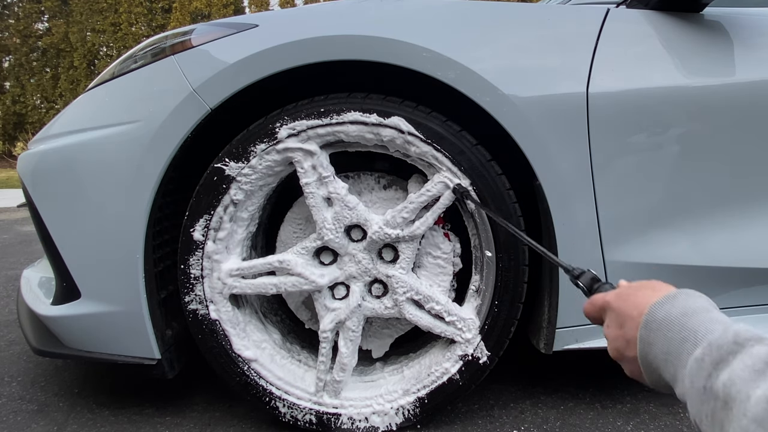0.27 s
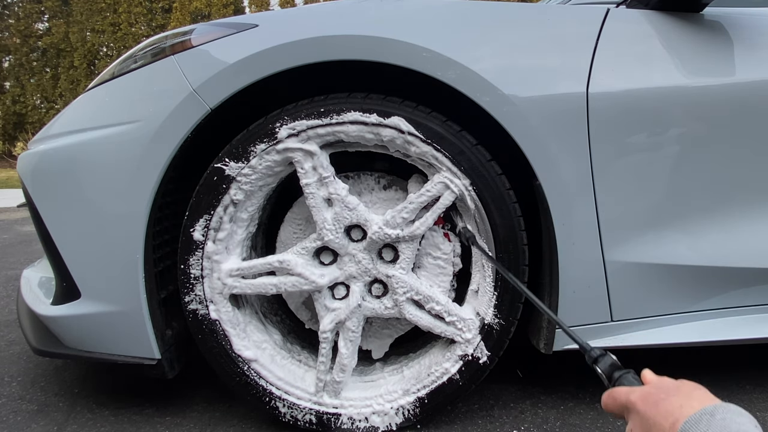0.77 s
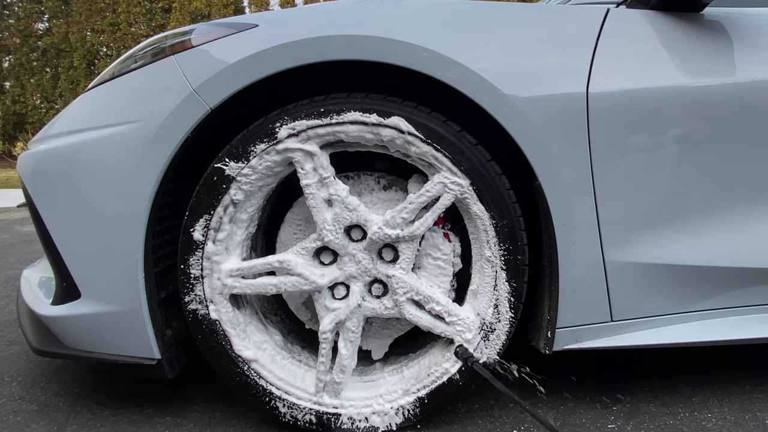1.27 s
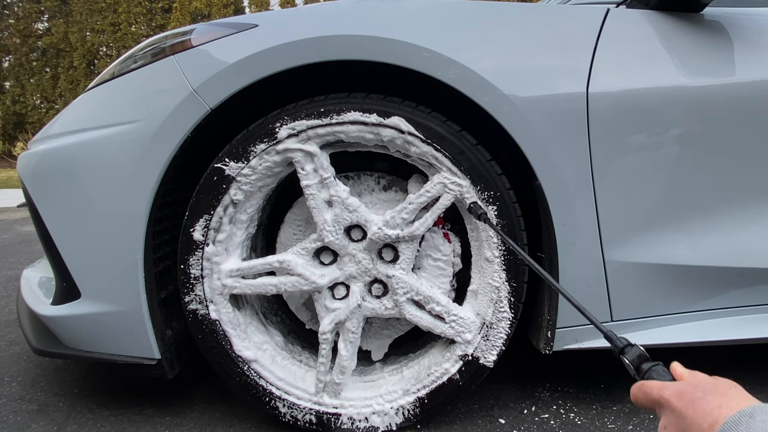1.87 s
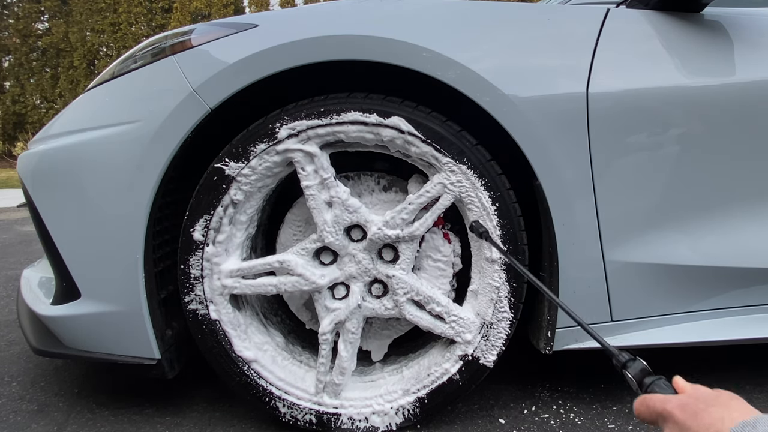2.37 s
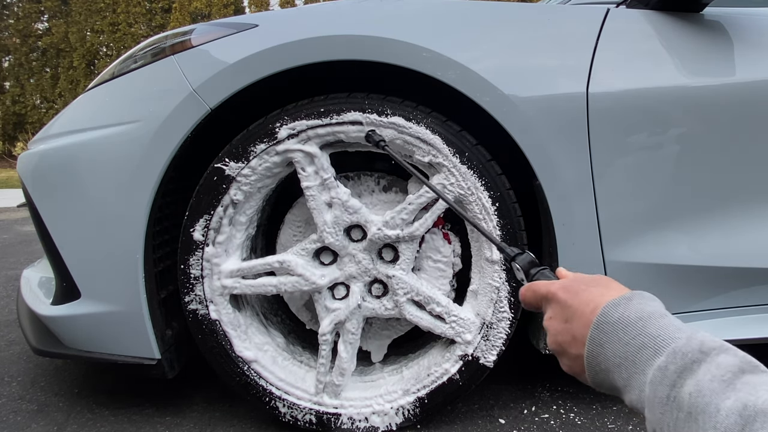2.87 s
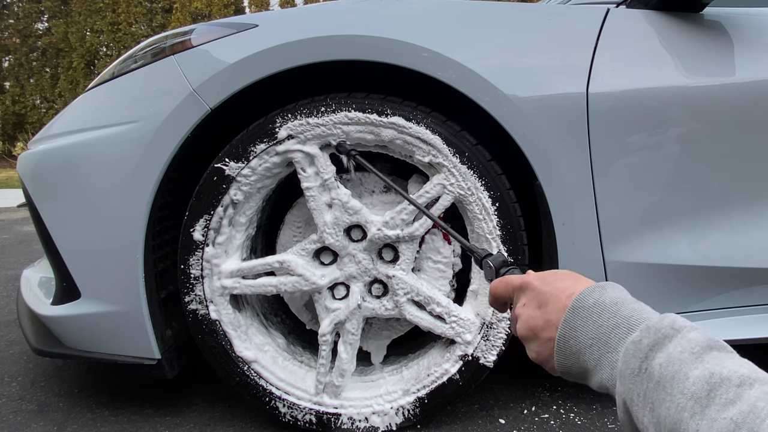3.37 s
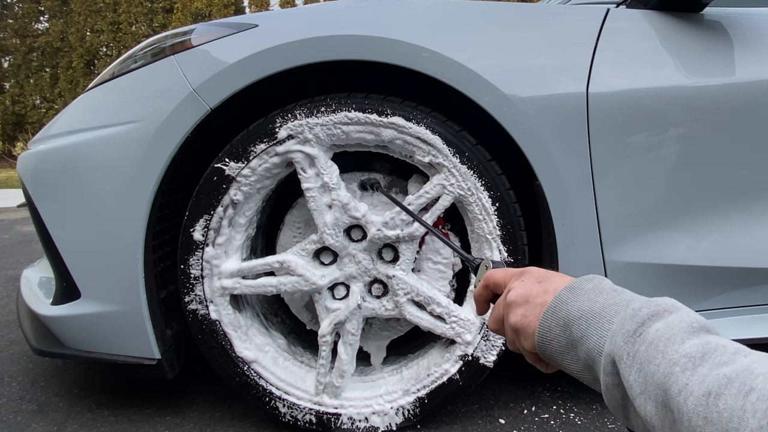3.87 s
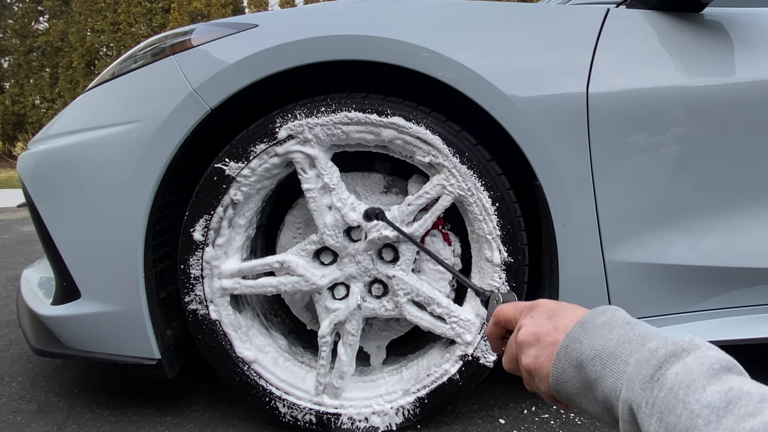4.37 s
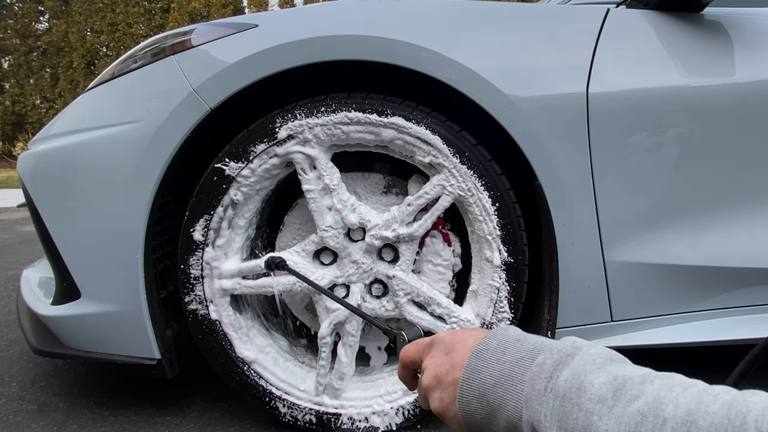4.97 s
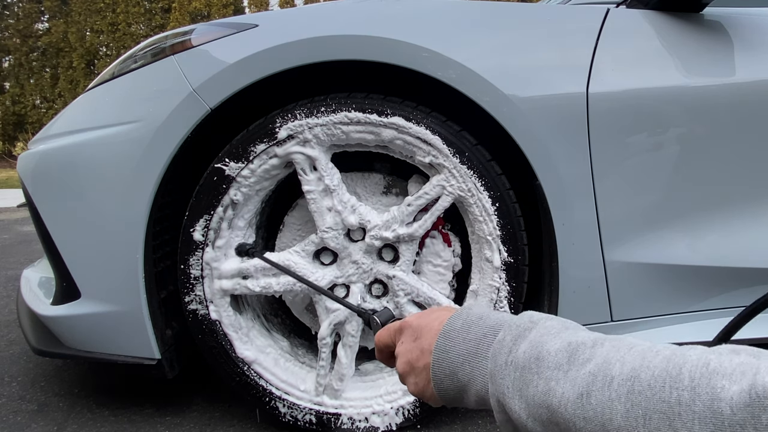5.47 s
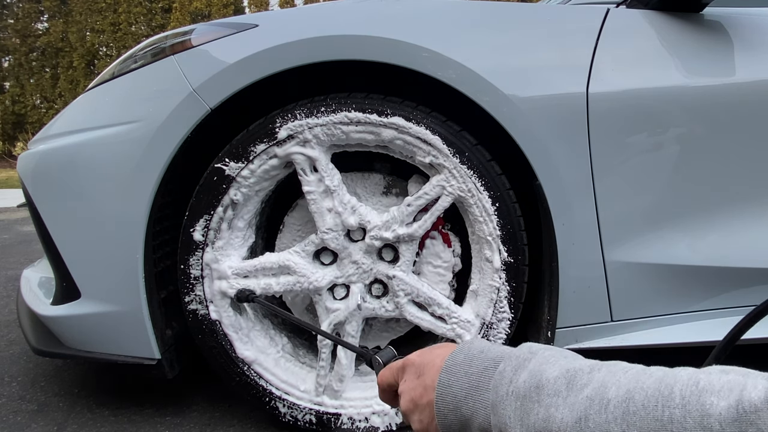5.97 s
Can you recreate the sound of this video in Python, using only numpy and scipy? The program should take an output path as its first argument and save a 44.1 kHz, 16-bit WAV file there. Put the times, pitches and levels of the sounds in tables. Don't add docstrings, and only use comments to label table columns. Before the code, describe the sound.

A hand-pumped sprayer hisses steadily onto a foamy car wheel, its airy sputtering spray shifting as the wand sweeps, while wind rumbles on the microphone.

```python
import sys
import numpy as np
from scipy import signal
from scipy.fft import rfft, irfft
from scipy.io import wavfile
from scipy.ndimage import map_coordinates

SR = 44100
rng = np.random.default_rng(int(sys.argv[2]) if len(sys.argv) > 2 else 0)


def materialize(psi):
    bounded = np.clip(np.atleast_2d(psi).T, -1, 1)
    quanta = np.round(bounded * 32767).astype(np.int16)
    wavfile.write(sys.argv[1], SR, quanta)


def field_ratio(decibels):
    return 10 ** (np.asarray(decibels, dtype=float) / 20)


N = 274743
SIDES = np.array([[1], [-1]])

# time in seconds, lead in samples.
WAND_LEAD = [(0, 5.3), (.08, 5.5), (.27, 5.7), (.36, 2.8), (.5, 2.2), (2.5, 2.2), (2.6, 3.4), (2.84, 3.6),
             (2.88, 5.1), (3.0, 5.5), (3.1, 6.7), (3.5, 6.5), (3.74, 7.2), (3.86, 6.2), (4.2, 6), (4.38, 5),
             (4.5, 6.5), (4.75, 7.4), (5.08, 7.2), (5.22, 8.3), (5.5, 7.8), (5.8, 8.5), (6.23, 8.4)]
# time in seconds, hiss level in dB.
FLOW = [(0, -48.5), (.2, -48), (.33, -44), (.42, -40), (.6, -39.5), (.8, -42), (1.2, -41), (1.4, -45),
        (1.85, -39.5), (2.3, -49), (2.55, -44.5), (3.2, -39.5), (3.6, -46.5), (4.5, -45), (5.7, -48),
        (5.95, -43), (6.15, -43), (6.23, -47)]
# centre in seconds, length in seconds, hiss gain in dB,
# splash gain in dB.
STRIKES = [(.2, 0.058, 0, 2), (.36, 0.15, -4.5, 0), (.55, 0.17, -1.5, -6), (.97, 0.33, 1, 4),
           (1.42, 0.16, 1, 5), (1.55, 0.13, 2, 0.5), (1.66, 0.15, 2.5, 0), (1.78, 0.3, -4.5, 2),
           (1.9, 0.15, -0.5, 1.5), (2.22, 0.33, 3.5, 1.5), (2.48, 0.68, 5, 6), (3.4, 0.065, 1, 5.5),
           (3.55, 0.38, 4, 3), (3.7, 0.11, 4.5, 4.5), (3.8, 0.089, 3, 4), (3.9, 0.046, 3.5, 2),
           (4.03, 0.15, 5.5, -6), (4.15, 0.076, 3, 4.5), (4.25, 0.12, 7, 7), (4.33, 0.04, 6.5, 5.5),
           (4.44, 0.11, 6, 5), (4.68, 0.18, 5.5, -0.5), (4.88, 0.23, 1.5, -3.5), (5.03, 0.16, 6, 0),
           (5.15, 0.13, 2, -2), (5.28, 0.24, 3, 3), (5.48, 0.14, 0.5, 0), (5.61, 0.14, 5, 3.5),
           (5.82, 0.13, 1, 0)]
# time in seconds, share from 0 to 1.
SCATTER = [(0, 1), (.07, 0.15), (.14, 1), (.4, 0.9), (2.5, 0.9), (2.65, 0.67), (2.95, .45), (3.3, 0.85),
           (3.42, 0.5), (3.55, 0.82), (3.82, 0.74), (3.88, .2), (4.03, 0.2), (4.15, 0.5), (4.27, 0.9),
           (4.38, 0.3), (4.46, 1), (4.8, 0.75), (5.1, 0.42), (6.23, 0.2)]
# delay in ms, slide in ms per sample of lead, wander in ms, level in dB,
# extra left lead in samples.
ECHOES = [(0.55, .03, 0.039, -8.5, 2.7), (0.85, -.04, 0.054, -8.5, -2.08), (1.247, .01, 0.037, -9.5, 1.2),
          (1.898, .08, 0.091, -9, -2.5), (2.8, -.1, 0.14, -8.5, 4), (4.099, .12, 0.22, -13, -3.5)]
# centre in seconds, length in seconds, pitch in Hz, level in dB.
HOLLOWS = [(0.195, 0.14, 2380, -49.5), (0.316, 0.032, 1630, -42.5), (0.37, 0.14, 2630, -46),
           (0.56, 0.31, 1155, -52.5), (0.946, 0.058, 1540, -46), (0.987, 0.052, 2400, -45),
           (1.255, 0.024, 1240, -46), (1.784, 0.058, 1250, -52), (2.225, 0.095, 1750, -49),
           (2.503, 0.15, 1660, -50), (3.805, 0.031, 1830, -50), (4.036, 0.098, 2180, -47.5),
           (0.634, 0.25, 6760, -39.5), (2, 0.28, 9750, -45), (3.797, 0.11, 8900, -44),
           (4.023, 0.14, 8800, -40.5), (4.225, 0.057, 7740, -39), (5.85, 0.096, 4170, -79)]
# frequency in Hz, level in dB per Hz.
NOZZLE_SPECTRUM = [(8500, -29), (9500, 5.5), (10500, 9), (12000, 7.5), (13500, 6), (15000, 4), (15800, -2)]
BODY_SPECTRUM = [(2500, -19.5), (3500, -2), (4300, -4), (5000, -1.5), (5700, -6.5), (6300, 1), (7000, -1.5),
                 (8000, -1.5), (9000, -1.5), (10000, -37)]
SPLASH_SPECTRUM = [(600, -13.5), (1000, -5), (1500, -3.5), (2000, -1.5), (2600, 0.5), (3300, -3),
                   (4200, -61)]
# frequency in Hz, left lead in radians.
TOP_PHASE = [(9300, 9.4), (10000, 6.85), (10400, 6.45), (11600, 6.15), (12400, 4.5), (13430, 3.14),
             (14400, 2.3), (15400, 0)]
# frequency in Hz, left minus right in dB.
TOP_BALANCE = [(9000, -8), (10200, 0), (11500, -1.5), (12300, -1), (13400, 1), (16000, -3)]
# frequency in Hz, level in dB.
TOP_UNLIKE = [(9000, 0.5), (10000, -11), (10700, -11), (11400, -13.5), (12300, -10), (13400, -26),
              (14300, -9), (15500, -7)]
# frequency in Hz, left lead in radians.
PORT_TWIST = [(1400, 0), (2000, -.4), (3200, -.1), (4100, -.3), (5800, .9), (6400, -1.1), (7400, -.7),
              (8600, 2.3)]
# start in seconds, peak in dB, left minus right in dB,
# starting pitch in Hz.
PUFFS = [(0.901, -34, 4, 480), (0.945, -55, 7, 503), (0.981, -51, 4.0, 504), (1.162, -31, 13, 474),
         (3.848, -35, 19, 495), (3.896, -31, 20, 540), (3.955, -34, 1.5, 500), (4.042, -45, 6, 497),
         (4.124, -36, -2, 507), (4.294, -39, 17, 496), (4.328, -38, 20, 506), (4.406, -39.5, 21, 493),
         (5.344, -36.5, 33, 494), (6.157, -36, -1, 503)]
# time in seconds, level in dB.
BREEZE = [(0, -54), (.5, -55), (1.3, -56), (1.9, -61.5), (2.6, -54), (3.1, -57), (3.9, -51.5), (4.3, -62),
          (4.8, -63), (5.85, -58), (6.23, -59.5)]
# centre in seconds, length in seconds, rise in dB,
# left minus right in dB.
GUSTS = [(.64, 0.34, 9.5, 3), (.94, 0.28, 13, 6), (1.17, 0.33, 5, 7), (1.36, 0.061, 0.5, 16),
         (1.71, 0.26, 12.5, 18.5), (2.1, 0.47, 4, 5), (2.55, 0.12, 0, -2), (2.75, 0.16, 6, 2),
         (2.86, 0.2, 8.5, 9), (3.25, 0.12, 2, 9), (3.72, 0.067, 3, 2), (3.88, 0.073, 4.5, 1.5),
         (4.05, 0.052, 4, 18), (4.31, 0.18, 5.5, 0), (4.43, 0.21, 3, 5), (5.0, 0.28, 2, -4),
         (5.24, 0.36, 6.5, 7.5), (5.39, 0.3, 16.5, 10.5), (5.6, 0.32, 15, 18.5), (5.72, 0.15, 4.5, 4),
         (5.84, 0.13, -4, 1), (6.03, 0.11, 6.5, 7), (6.16, 0.083, 11, 7)]
# centre in seconds, length in seconds, gain in dB.
GROUNDSWELL = [
    (3.3, 1.1, -4.5),
    (4.75, 1.4, 5.5),
    (5.7, 0.44, -0.5),
]
# frequency in Hz, level in dB per Hz.
RUMBLE_SPECTRUM = [(70, -8), (100, 3), (150, 0), (220, -4.5), (300, -7.5), (400, -16)]
FLUTTER_SPECTRUM = [(220, 2.5), (280, -6), (400, -6), (600, -8.5), (1000, -21.5)]
DEEP_SPECTRUM = [(25, -38), (40, 0.5), (55, 1.5), (77, 9), (95, -9.5), (130, -16)]
# frequency in Hz, level in dB per Hz.
STREET_SPECTRUM = [(150, -13), (300, -7), (500, -3.5), (800, 4.5), (1200, 2.5), (1800, -8), (3000, -5.5)]
# frequency in Hz, width in Hz, gain in dB.
HOUSING = [(5080, 350, 2), (5690, 90, 9), (6230, 180, -8), (6700, 500, 2), (7650, 250, -6), (8030, 60, 4)]


def spray():
    flow_db, lead = in_time(FLOW)[0], in_time(WAND_LEAD)[0]
    flare_db, slap_db = swells(STRIKES)
    scatter = np.clip(in_time(SCATTER)[0], 0, 1)
    full_flow_db = -43
    hiss_db = flow_db + flare_db
    body_db = -43.5 + 0.91 * (hiss_db - full_flow_db) + 0.062 * slap_db
    splash_db = -55.5 + 0.36 * (flow_db - full_flow_db) + 0.4932 * lead + slap_db

    ports = wheel(turbulence(2500, 2.9, -8.5), lead, scatter)
    nozzle = field_ratio(hiss_db + 3.5 + 0.9 * drift(11.0)) * colour(top_pair(ports), NOZZLE_SPECTRUM)

    twist = np.exp(.5j * at_hz(PORT_TWIST) * SIDES)
    body = field_ratio(body_db + 1.0) * colour(ports, BODY_SPECTRUM, twist)
    pan = field_ratio((-1.5 + 1.77 * lead) / 2 * SIDES)
    body = body + (pan - 1) * resonate(body, hz=4632, width=1400)

    foam = turbulence(1500, 4.3, -3.0)
    foam_ports = rms_one(np.array([foam, delayed(foam, lead)]))
    spatter = 0.57 * scatter * rng.standard_normal((2, N))
    foam = 0.65 * rms_one(ports) + foam_ports + spatter
    splash = field_ratio(splash_db + 1.0 + 2.0 * drift(7.8)) * colour(foam, SPLASH_SPECTRUM, twist)
    return nozzle + body + splash + hollows(foam)


def turbulence(droplets_per_s, spread_db, droplet_db):
    size_db = spread_db * np.minimum(rng.exponential(1, N), 5)
    sizes = field_ratio(size_db) * rng.choice([-1, 1], N)
    droplets = rms_one(sizes * (rng.random(N) < droplets_per_s / SR))
    sputter_db = 0.62 * drift(33.0) + 1.5 * drift(200.0)
    return (rng.standard_normal(N) + field_ratio(droplet_db) * droplets) * field_ratio(sputter_db)


def wheel(jet, lead, scatter):
    left, right = jet.copy(), delayed(jet, lead)
    for delay_ms, slide, wander, level_db, extra in ECHOES:
        path = (delay_ms + slide * lead + wander * drift(2.5)) * SR / 1000
        echo = field_ratio(level_db + 4.3 * drift(2.9)) * jet
        left += delayed(echo, path)
        right += delayed(echo, path + lead + scatter * extra)
    return np.array([left, right])


def top_pair(ports):
    shared, other = rfft(ports)
    turn = np.exp(.5j * at_hz(TOP_PHASE)) * field_ratio(at_hz(TOP_BALANCE) / 2)
    unshared = field_ratio(at_hz(TOP_UNLIKE)) * np.roll(other, 4000)
    return irfft([(shared + unshared) * turn, (shared - unshared) / turn], N)


def hollows(ports):
    out, t = np.zeros((2, N)), np.arange(N) / SR
    for s, length, hz, level_db in HOLLOWS:
        near = slice(max(0, int((s - 2 * length) * SR)), int((s + 2 * length) * SR))
        swell = np.exp(-8 * ((t[near] - s) / length) ** 2)
        ring = rms_one(resonate(ports[:, near], hz, 0.1 * hz))
        out[:, near] += field_ratio(level_db) * swell * ring
    return out


def puffs():
    out, t = np.zeros((2, N)), np.arange(3000) / SR
    for s, peak_db, pan_db, start_hz in PUFFS:
        pitch = 75 + start_hz * np.exp(-t / 0.00488)
        envelope = np.exp(-t / 0.0079) * np.minimum(t / 0.006, 1)
        push = np.sin(2 * np.pi * np.cumsum(pitch) / SR) * envelope
        at = int(s * SR)
        out[:, at:at + 3000] += (field_ratio(peak_db - 2.5 + pan_db / 2 * SIDES) * push)[:, :N - at]
    return out


def wind():
    breeze_db, t = in_time(BREEZE)[0], np.arange(N) / SR
    rise_db, pan_db = swells(GUSTS)
    gust_db = breeze_db + rise_db
    pan_db = pan_db - 2
    flutter_db = -3 - 0.58 * rise_db + 0.66 * t
    deep_db = 0.5 + 2.5 - 0.057 * rise_db - 1.16 * t + swells(GROUNDSWELL)[0]

    lumps = field_ratio([2.5 * drift(24.0) for side in range(2)])
    rumble = colour(rng.standard_normal((2, N)), RUMBLE_SPECTRUM)
    flutter = field_ratio(flutter_db - 6.5) * colour(rng.standard_normal((2, N)), FLUTTER_SPECTRUM) * lumps
    gusts = field_ratio(gust_db + 2.5 + pan_db / 2 * SIDES) * lumps * (rumble + flutter)

    mid, side = colour(rng.standard_normal((2, N)), DEEP_SPECTRUM)
    deep = np.array([0.5 * side + mid, -1.2 * side + mid]) * field_ratio(1.2 * SIDES)
    return gusts + field_ratio(gust_db + deep_db) * deep


def street():
    mid, side = colour(rng.standard_normal((2, N)), STREET_SPECTRUM)
    unlike, lead = 0.75, 13
    ports = np.array([mid + unlike * side, delayed(mid - unlike * side, lead)])
    return field_ratio(-57 + 2.0 + 0.63 * drift(0.1)) * ports * field_ratio(.8 * SIDES)


def rms_one(x):
    return x / np.sqrt(np.mean(x ** 2) + 1e-20)


def in_time(rows):
    s, *columns = np.transpose(rows)
    return [np.interp(np.arange(N) / SR, s, c) for c in columns]


def swells(rows):
    s, length, *columns = np.transpose(rows)
    t = np.arange(0, N + 64, 64) / SR
    bells = np.exp(-8 * ((t[:, None] - s) / length) ** 2)
    return [np.interp(np.arange(N) / SR, t, bells @ c) for c in columns]


def drift(rate):
    r = np.exp(-16 * np.pi * rate / SR)
    slow = signal.lfilter([1], [1, -2 * r, r * r], rng.standard_normal(N // 8 + 8002))[8000:]
    return np.interp(np.arange(N) / 8, np.arange(len(slow)), rms_one(slow - slow.mean()))


def at_hz(points):
    hz = np.arange(N // 2 + 1) * SR / N + 1e-3
    table_hz, values = np.transpose(points)
    return np.interp(np.log(hz), np.log(table_hz), values)


def colour(x, spectrum, turn=1):
    closed = [(spectrum[0][0] / 2, -80)] + list(spectrum) + [(spectrum[-1][0] * 2, -80)]
    return rms_one(irfft(rfft(x) * field_ratio(at_hz(closed)) * turn, N))


def delayed(x, samples):
    return map_coordinates(x, [np.arange(N) - samples], order=3, mode="mirror")


def resonate(x, hz, width):
    r = np.exp(-np.pi * width / SR)
    poles = [1, -2 * r * np.cos(2 * np.pi * hz / SR), r * r]
    return signal.lfilter([(1 - r * r) / 2, 0, (r * r - 1) / 2], poles, x)


def scene():
    return spray() + wind() + puffs() + street()


def roll_off(x):
    return signal.sosfilt(signal.butter(12, 16990, fs=SR, output="sos"), x)


def record(dry):
    for hz, width, gain_db in HOUSING:
        dry = dry + (field_ratio(gain_db) - 1) * resonate(dry, hz, width)
    return roll_off(dry)


dry = scene()
out = record(dry)
materialize(out)
```